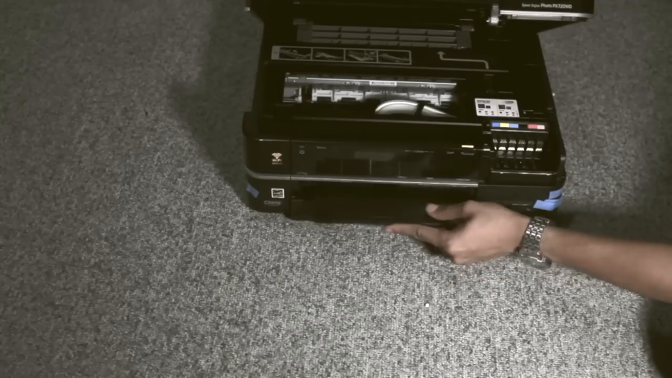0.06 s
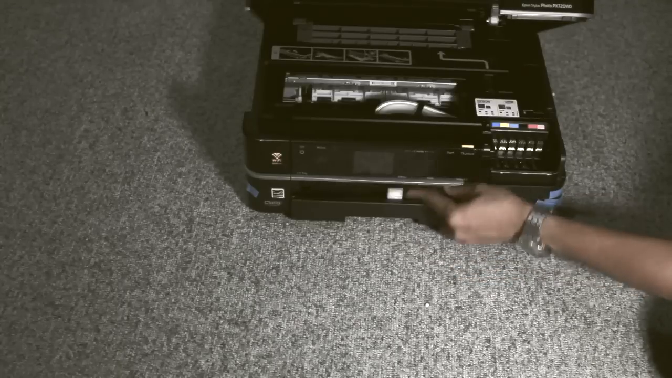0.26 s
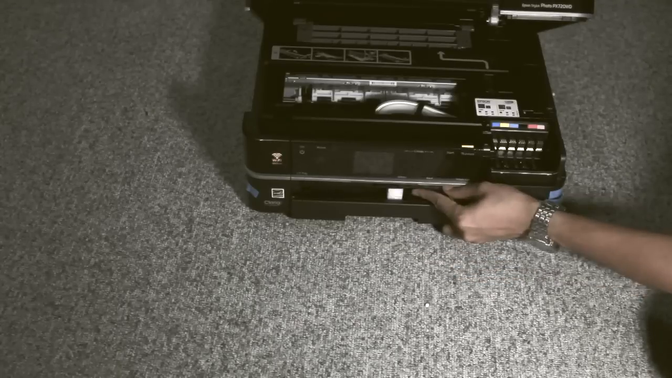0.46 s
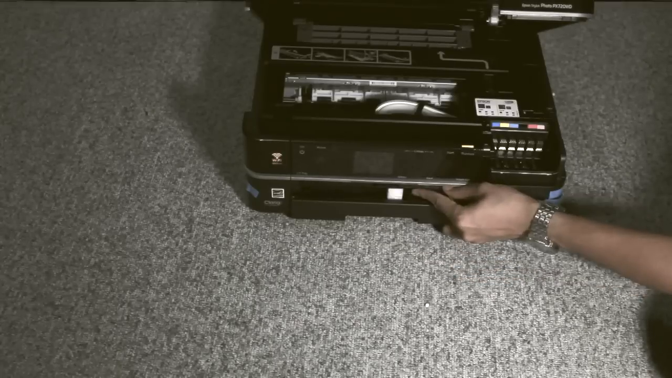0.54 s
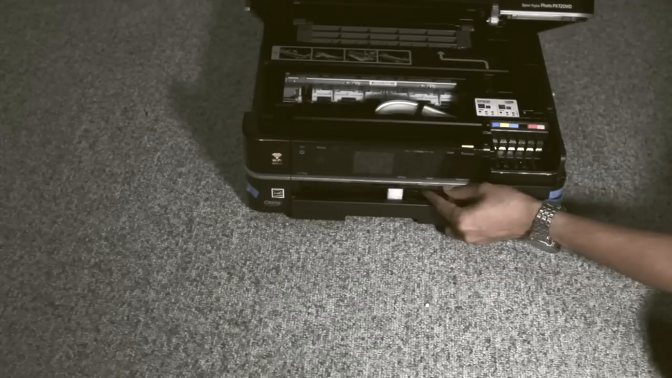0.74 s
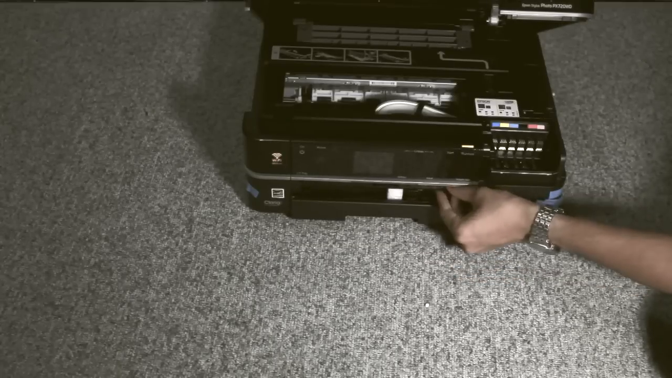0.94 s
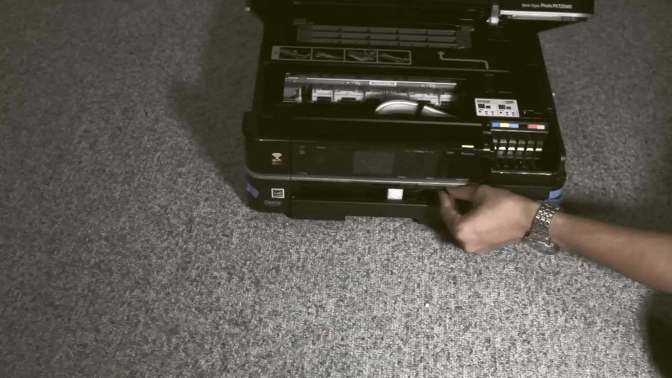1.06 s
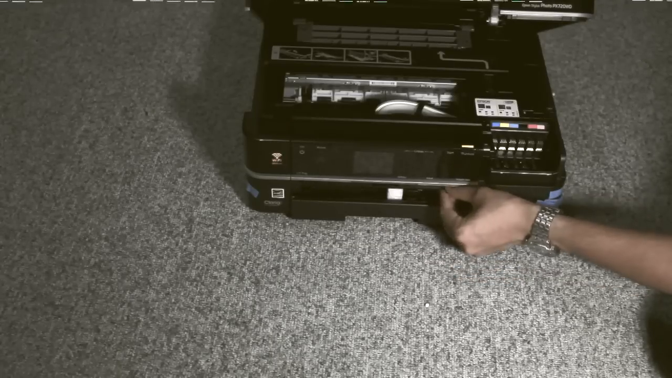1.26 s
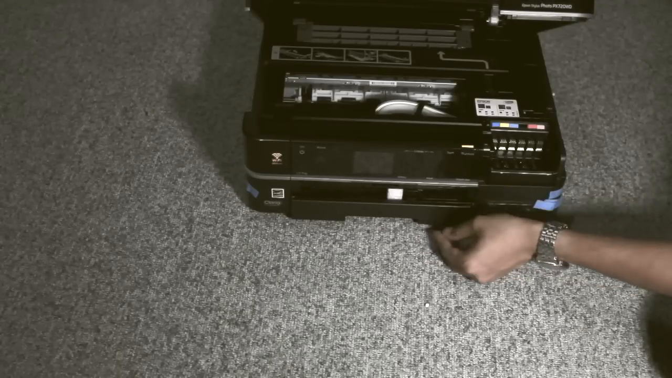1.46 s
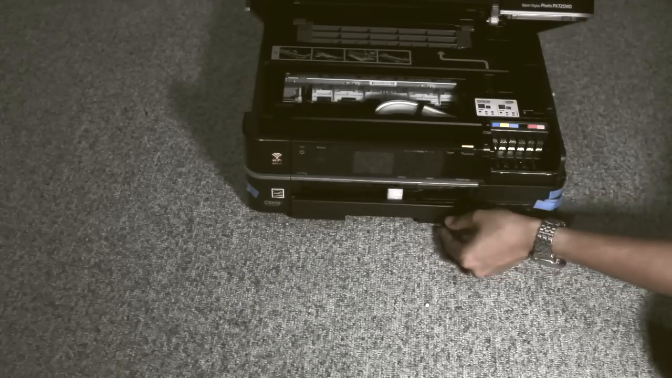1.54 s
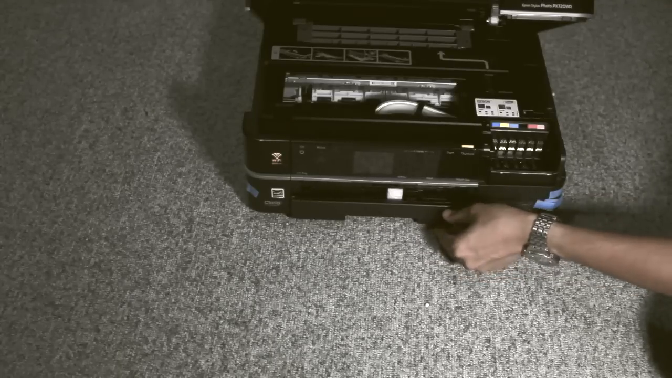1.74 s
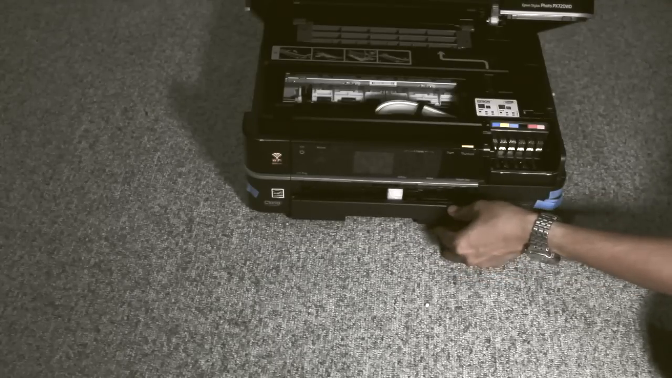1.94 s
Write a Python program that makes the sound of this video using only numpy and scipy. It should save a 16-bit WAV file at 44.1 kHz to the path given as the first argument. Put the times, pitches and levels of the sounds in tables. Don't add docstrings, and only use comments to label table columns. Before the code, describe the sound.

A plastic paper tray is pushed into a printer. The fading tail of an earlier knock opens; at 0.23 s the tray taps its rail brightly, scrapes briefly, and snaps home at 0.30-0.32 s with a hard, loud double click and small rebound. A short carpeted-room tail follows. Then very faint finger ticks and rubs, clearest near 1.56 s, over steady soft hiss, low rumble and faint hum.

```python
import sys
import numpy as np
from scipy import signal
from scipy.io import wavfile

SR = 44100
rng = np.random.default_rng(int(sys.argv[2]) if len(sys.argv) > 2 else 0)


def boost(x):
    u = np.asarray(x, float) / 20
    return 10 ** u


def store_pcm(level_fs):
    pcm = np.round(np.clip(level_fs, -1, 1) * 32767).astype(np.int16)
    wavfile.write(sys.argv[1], SR, np.atleast_2d(pcm).T)


N = 90405
LEAD = 4410
CENTRES = 20 * 2 ** np.arange(.25, 10, .5)


# (time [s], level [dB], chatter length [s], colour [Hz])
KNOCK_TOUCHES = [
    (.2284, -31, 0.0053, 4900),
    (.2296, -29.5, 0.0028, 4800),
    (.2318, -32.5, 0.0026, 4850),
    (.2340, -38, 0.0049, 2200),
    (.2405, -42, .002, 2500),
    (.236, -38.5, 0.017, 650),
]
# (frequency [Hz], level [dB], t60 [s])
LIP_MODES = [(550, 0, 0.02), (1325, -1, .03), (1600, -3.5, 0.045), (1842, -3, 0.027), (2190, -5, 0.065),
             (2300, -1, 0.02), (3300, -2, .04), (3600, -6.5, 0.015), (4370, -1.5, 0.013), (5340, -2, 0.06),
             (5790, -19, 0.051), (7350, -12.5, 0.027)]


def knock():
    return contacts(KNOCK_TOUCHES, LIP_MODES, body_db=-29, reach_db=12)


# (time [s], level [dB], chatter length [s], colour [Hz])
SNAP_TOUCHES = [
    (.2895, -40, 0.0084, 12100),
    (.3022, -30, 0.003, 6130),
    (.3033, -18.5, 0.0014, 7000),
    (.3045, -20.5, 0.0075, 3300),
    (.3065, -27.5, 0.01, 462),
    (.3094, -21.5, 0.0022, 2969),
    (.3185, -27, 0.0027, 1480),
]
# (frequency [Hz], level [dB], t60 [s])
BODY_MODES = [(240, -1.5, 0.064), (338.7, 0.5, 0.043), (572.4, -6.5, 0.076), (584, 1, 0.045),
              (790, 4, 0.026), (1096, -1.5, 0.072), (1467, -9.5, 0.033), (1869, 0, 0.013),
              (2400, -12, 0.018), (3228, -3, 0.015), (3909, -5.5, 0.015), (4600, -5, 0.0042),
              (5187, 1.5, .015), (6500, -7, 0.01)]


def snap():
    return contacts(SNAP_TOUCHES, BODY_MODES, body_db=-36.5, reach_db=5)


SLIDE_FROM_S, SLIDE_LATEST_S, SLIDE_DB, SLIDE_HZ = 0.22, 0.35, -43.5, 2500


def slide():
    out, t = silence(), np.arange(LEAD) / SR
    shape = np.clip(t / 0.011, 0, 1) * (t < SLIDE_LATEST_S - SLIDE_FROM_S)
    add(out, SLIDE_FROM_S, SLIDE_DB, chatter(shape, SLIDE_HZ, BODY_MODES, body_db=-82, reach_db=7.5))
    return out


# (time [s], level [dB], chatter length [s], colour [Hz])
EARLIER_TOUCHES = [
    (-.07, -32, 0.015, 705),
    (-.06, -38, .02, 2120),
]


def earlier_knock():
    return contacts(EARLIER_TOUCHES, BODY_MODES, body_db=-90, reach_db=8.5)


# (time [s], level [dB], chatter length [s], colour [Hz])
FINGER_TOUCHES = [(.174, -57.5, 0.008, 2917), (.604, -58.5, 0.052, 443), (.715, -71.5, 0.018, 3340),
                  (.756, -60.5, .025, 714), (.822, -60.5, 0.0054, 2800), (.8265, -61.5, .007, 3200),
                  (.98, -68.5, .02, 857), (1.256, -64.5, 0.0047, 3500), (1.295, -69.5, .02, 2700),
                  (1.323, -65.5, 0.0056, 3010), (1.342, -64, 0.039, 2500), (1.345, -59, 0.02, 665),
                  (1.36, -69, 0.025, 5070), (1.548, -72, .01, 2083), (1.5602, -47.5, 0.0032, 2100),
                  (1.5645, -52.5, 0.0043, 1480), (1.635, -71, 0.026, 1997), (1.666, -63, 0.0063, 1795),
                  (1.3, -65.5, 0.04, 900), (1.385, -73, .03, 1210), (1.6, -65, .02, 500),
                  (1.563, -59.5, 0.025, 500), (1.66, -59.5, 0.01, 300)]


def finger_ticks():
    return contacts(FINGER_TOUCHES, LIP_MODES, body_db=-35.5, reach_db=16)


# (time [s], length [s], level [dB], pitch [Hz])
SQUEAK_EVENTS = [
    (1.111, 0.052, -74.5, 3440),
    (1.244, .03, -72, 1125),
    (1.31, 0.02, -75, 1730),
    (1.455, 0.07, -77, 3050),
    (1.866, 0.071, -79.5, 2400),
    (0.735, 0.018, -76, 6500),
]
SQUEAK_WIDTH_HZ = 210


def squeaks():
    out, t = np.zeros(N), np.arange(N) / SR
    for s, length, db, hz in SQUEAK_EVENTS:
        u = np.clip((t - s) / length, 0, 9)
        tone = ring(rng.standard_normal(N), hz, 3.4 / SQUEAK_WIDTH_HZ)
        out += boost(db) * rms_one(tone) * np.minimum(u * 8, 1) * np.exp(-u ** 2)
    return out


def contacts(rows, modes, body_db, reach_db):
    out, t = silence(), np.arange(LEAD) / SR
    onset = np.minimum(t / .0003, 1)
    for s, db, length, colour_hz in rows:
        shape = onset * np.exp(-(t / length) ** 2)
        add(out, s, db, chatter(shape, colour_hz, modes, body_db, reach_db))
    return out


TOUCHES_PER_S, TOUCH_SPREAD_DB = 12000, 3.5
DIRECT_LIKENESS = .75
# (frequency [Hz], density [dB per Hz])
CRACK_COLOUR = [(200, -10), (600, -7.5), (1600, -13), (3200, -6), (7500, -10), (10000, -23), (13000, -6.5),
                (16000, -16.5)]


def chatter(shape, colour_hz, modes, body_db, reach_db):
    chance, size, sign = rng.random((3, 2, len(shape)))
    touching = chance < TOUCHES_PER_S / SR
    clicks = shape * touching * boost(-TOUCH_SPREAD_DB * np.log(size + 0.024)) * np.sign(sign - .5)
    colour_db = at_hz(CRACK_COLOUR, CENTRES) + weight_db(CENTRES, colour_hz, reach_db)
    gains = boost(colour_db) * np.sqrt(CENTRES / SR) * (CENTRES > 50)
    energy = np.sum(shape ** 2)
    crack = 0
    for k, (_, band) in enumerate(bands([clicks + 1e-9])):
        level = np.sqrt(energy / np.sum(band ** 2, axis=1, keepdims=True))
        crack = crack + (-1) ** k * gains[k] * band * level
    blow = np.sqrt(energy) * (np.arange(len(shape)) == 8)
    body = 0
    for k, (hz, db, t60) in enumerate(modes):
        gain = boost(db + body_db + weight_db(hz, colour_hz, reach_db))
        body = body + (-1) ** k * gain * ring(blow, hz, t60)
    pressure = pair(crack[0], crack[1], DIRECT_LIKENESS) + body
    return np.vstack([pressure, np.outer(gains, shape) ** 2])


def weight_db(hz, colour_hz, reach_db):
    return -reach_db * (1 - np.exp(-np.log2(hz / colour_hz) ** 2))


def ring(clicks, hz, t60):
    r, w = boost(-60 / (t60 * SR)), 2 * np.pi * hz / SR
    return signal.lfilter([0, np.sin(w)], [1, -2 * r * np.cos(w), r * r], clicks + 1e-18)


def silence():
    return np.zeros((2 + len(CENTRES), N + 2 * LEAD))


def add(out, s, db, sound):
    i = LEAD + int(s * SR)
    out[:2, i:i + LEAD] += boost(db + 8) * sound[:2]
    out[2:, i:i + LEAD] += boost(db + 13.5) ** 2 * sound[2:]


def rms_one(x):
    return x / np.sqrt(np.mean(x ** 2) + 1e-20)


def at_hz(points, hz):
    table = np.array(points)
    return np.interp(np.log(hz), np.log(table[:, 0]), table[:, 1])


def bands(x):
    edges = 20 * 2 ** np.arange(0, 10.1, .5)
    for k, (low, high) in enumerate(zip(edges, edges[1:])):
        sos = signal.butter(2, [low, high], "band", fs=SR, output="sos")
        yield np.sqrt(low * high), signal.sosfilt(sos, x[k % len(x)])


def pair(mid, side, alike):
    alike = np.clip(alike, -1, 1)
    return np.sqrt(1 + alike) * mid + np.sqrt(1 - alike) * side * [[1], [-1]]


ROOM_DB, ROOM_GAP_S, ROOM_LIKENESS_HZ = -6.5, 0.0017, 500
# (frequency [Hz], density [dB per Hz])
TAIL_COLOUR = [(200, -9.5), (500, -4), (1100, -5), (2400, -11.5), (5500, -7.5), (9000, -17.5),
               (16000, -25.5)]
# (frequency [Hz], t60 [s])
ROOM_DECAY = [(200, .56), (700, .47), (2000, .41), (4000, .37), (6500, .33), (11000, .23), (15000, .17)]


def room(power):
    out, rise = 0, np.exp(-1 / (ROOM_GAP_S * SR))
    noise = rng.standard_normal((2, 2, power.shape[1]))
    for p, (hz, (mid, side)) in zip(power, bands(noise)):
        keep = boost(-120 / (at_hz(ROOM_DECAY, hz) * SR))
        stored = signal.lfilter([1 - keep], [1, -keep], p + 1e-24)
        held = signal.lfilter([1 - rise], [1, -rise], stored)
        field = pair(rms_one(mid), rms_one(side), 1 / (1 + (hz / ROOM_LIKENESS_HZ) ** 2))
        gain = boost(ROOM_DB + at_hz(TAIL_COLOUR, hz) - at_hz(CRACK_COLOUR, hz))
        out = out + gain * np.sqrt(held) * field
    return out


MIC_LOW_HZ, MIC_LEAK_DB = 192, -26
MIC_DIP_HZ, MIC_DIP_WIDTH_HZ, MIC_DIP_SHARE = 9800, 1800, 0.47


def microphone(x):
    high_pass = signal.butter(8, MIC_LOW_HZ, "high", fs=SR, output="sos")
    cut = signal.sosfilt(high_pass, x) + boost(MIC_LEAK_DB) * x
    b, a = signal.iirpeak(MIC_DIP_HZ, MIC_DIP_HZ / MIC_DIP_WIDTH_HZ, fs=SR)
    return cut - MIC_DIP_SHARE * signal.lfilter(b, a, cut)


HISS_DB, HUM_HZ, HUM_DB = -72.5, 52.58, -85.5
# (frequency [Hz], density [dB per Hz])
HISS_COLOUR = [(20, -13), (50, -21), (130, -31), (220, -28), (1300, -39), (5200, -36.5), (9000, -42),
               (16000, -44.5)]
# (frequency [Hz], likeness [-1 to 1])
FLOOR_LIKENESS = [(60, -0.54), (290, 0.56), (640, 0.17), (15000, -0.33)]


def hiss():
    out = 0
    for hz, (mid, side) in bands(rng.standard_normal((2, 2, N + LEAD))):
        out = out + boost(at_hz(HISS_COLOUR, hz)) * pair(mid, side, at_hz(FLOOR_LIKENESS, hz))
    out = out[:, LEAD:]
    hum = boost(HUM_DB) * np.sin(2 * np.pi * HUM_HZ * np.arange(N) / SR)
    return boost(HISS_DB) * out / np.sqrt(np.mean(out.mean(0) ** 2)) + hum


PAN_DB = .5


def scene():
    floor = hiss() + squeaks()
    tray = knock() + snap() + slide() + earlier_knock() + finger_ticks()
    direct = tray[:2] * boost(np.array([[.5], [-.5]]) * PAN_DB)
    heard = direct + room(tray[2:])
    return microphone(heard)[:, LEAD:LEAD + N] + floor


def top_cut(x):
    return signal.sosfilt(signal.butter(12, 16600, fs=SR, output="sos"), x)


CONVERTER_OFFSET = [
    [-.00285],
    [.00692],
]


def record(dry):
    low_pass = signal.cheby2(12, 60, 16500, fs=SR, output="sos")
    mix = signal.sosfilt(low_pass, dry) + np.array(CONVERTER_OFFSET)
    return top_cut(mix)


dry = scene()
out = record(dry)
store_pcm(out)
```